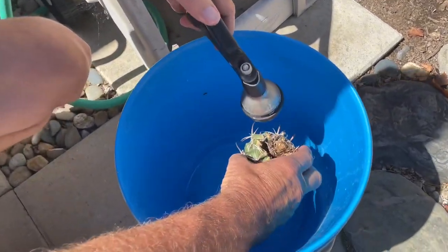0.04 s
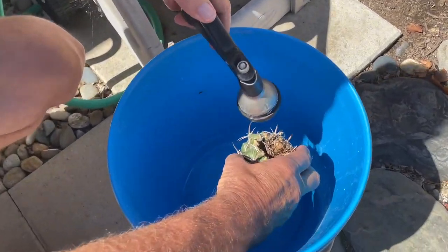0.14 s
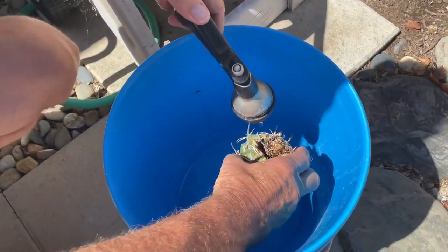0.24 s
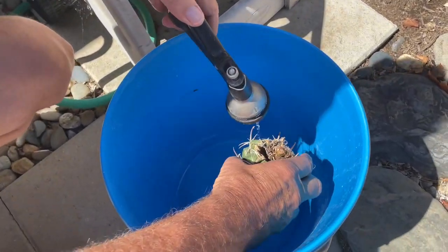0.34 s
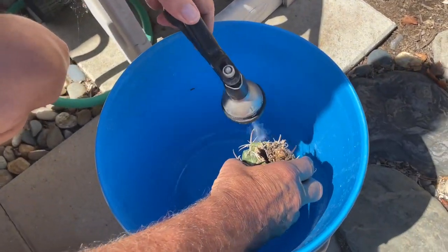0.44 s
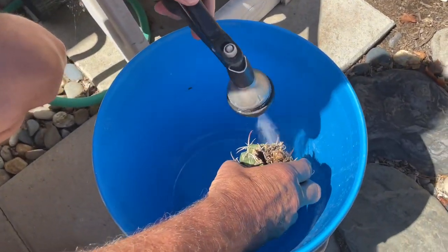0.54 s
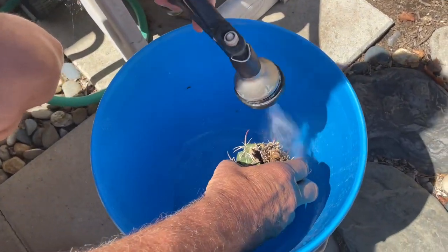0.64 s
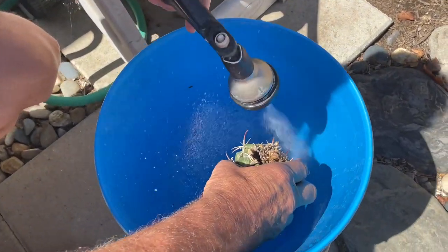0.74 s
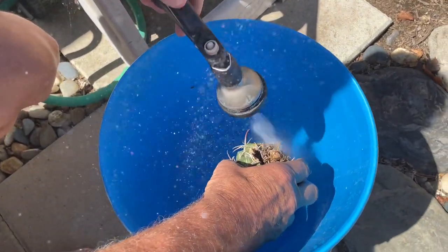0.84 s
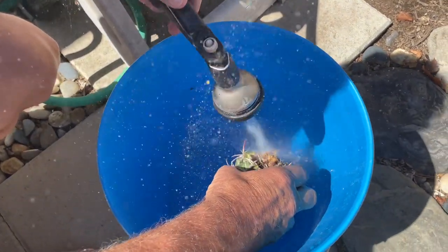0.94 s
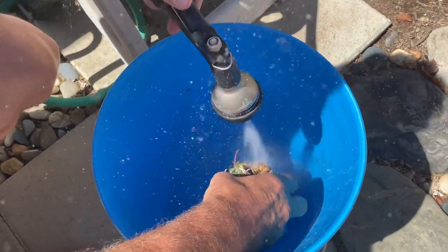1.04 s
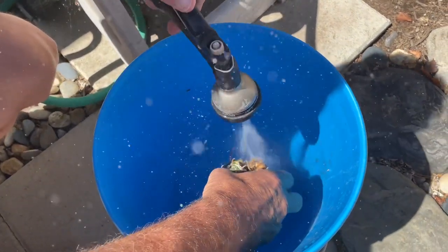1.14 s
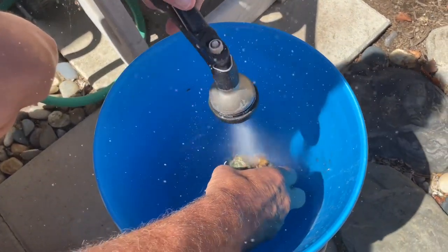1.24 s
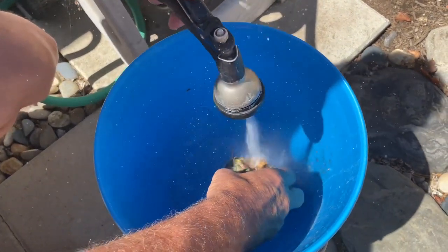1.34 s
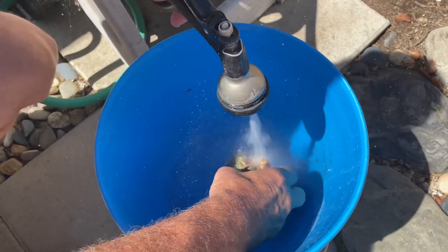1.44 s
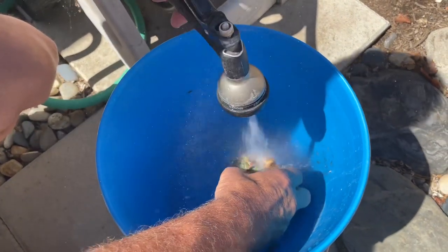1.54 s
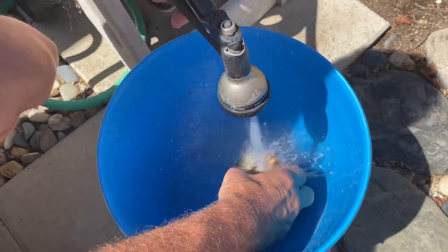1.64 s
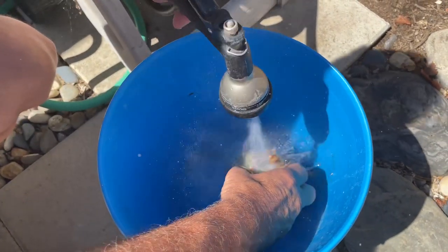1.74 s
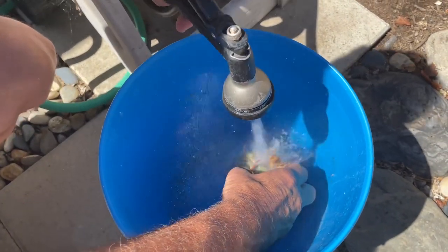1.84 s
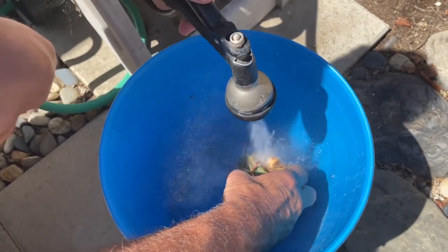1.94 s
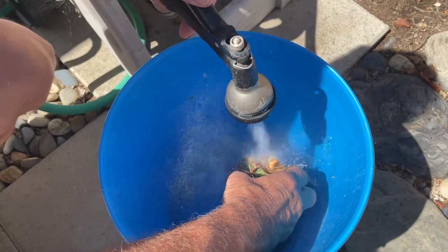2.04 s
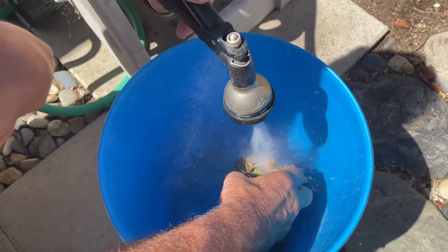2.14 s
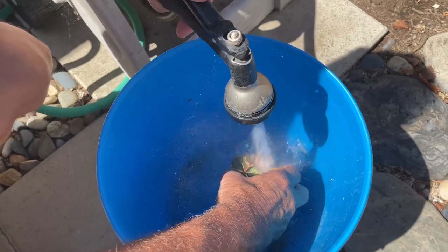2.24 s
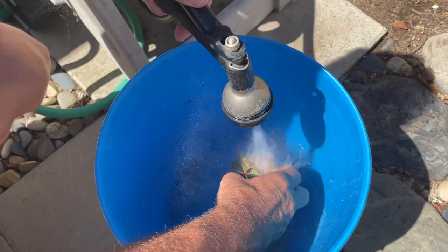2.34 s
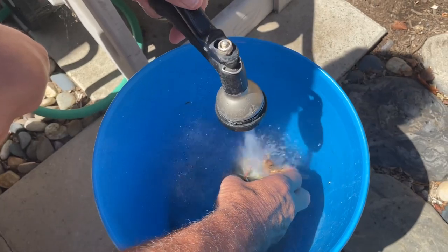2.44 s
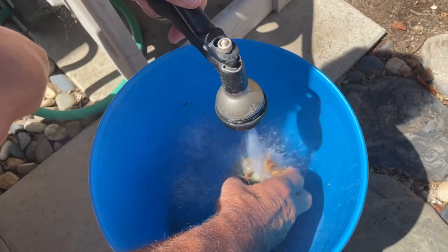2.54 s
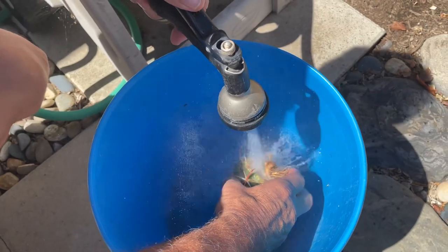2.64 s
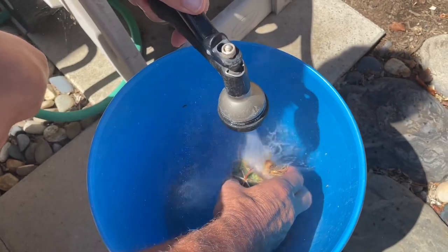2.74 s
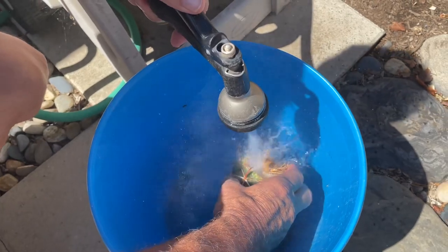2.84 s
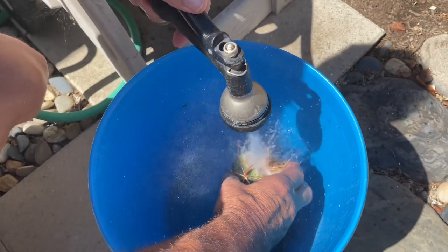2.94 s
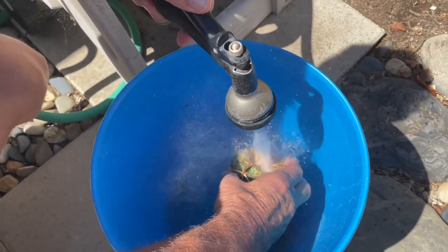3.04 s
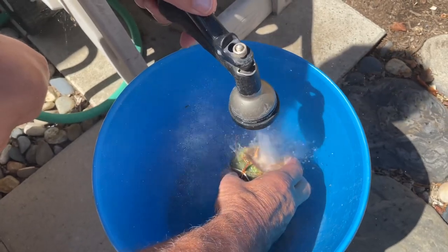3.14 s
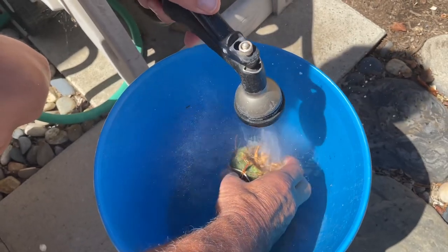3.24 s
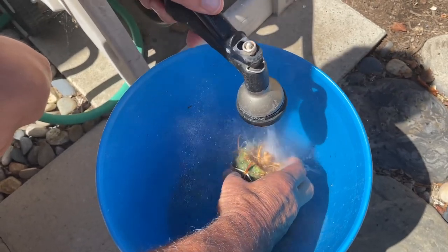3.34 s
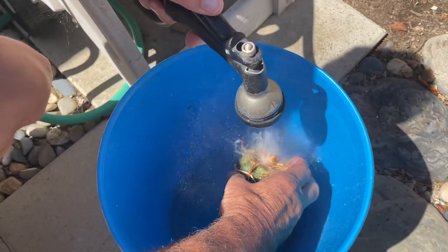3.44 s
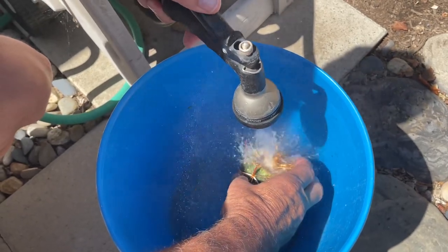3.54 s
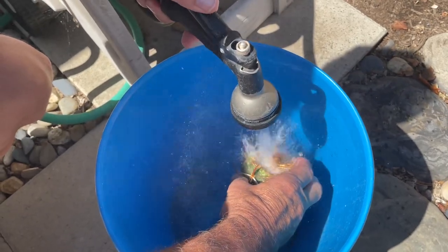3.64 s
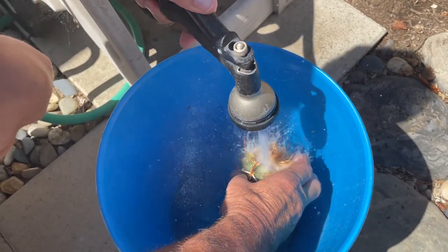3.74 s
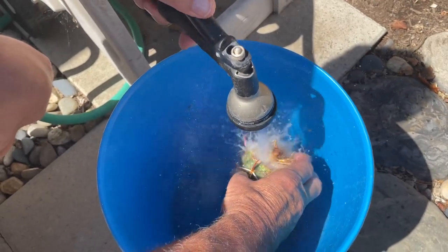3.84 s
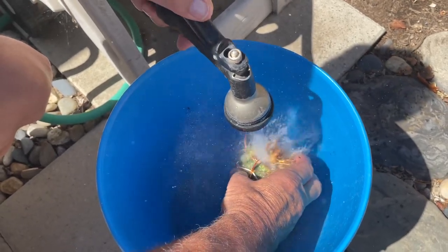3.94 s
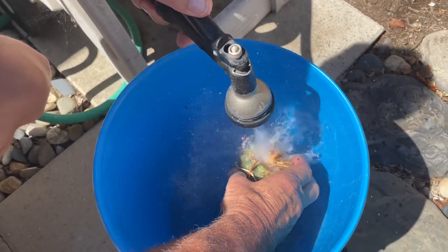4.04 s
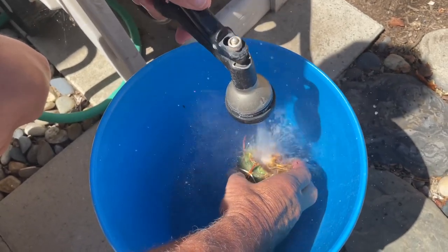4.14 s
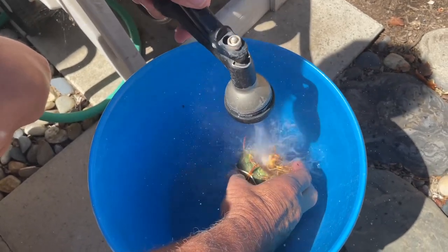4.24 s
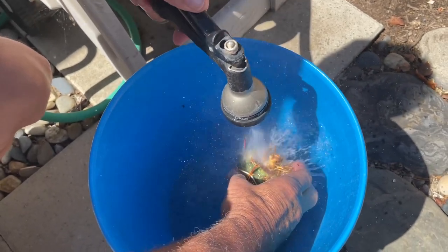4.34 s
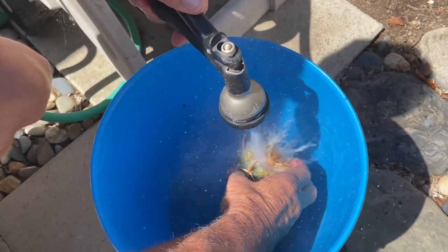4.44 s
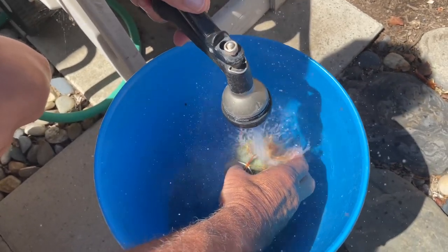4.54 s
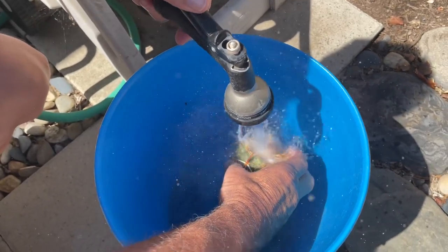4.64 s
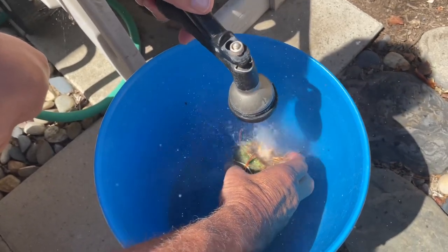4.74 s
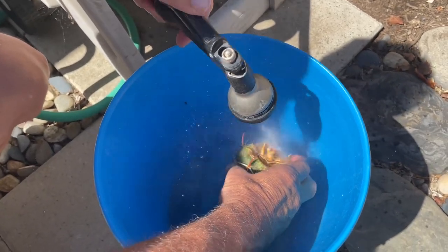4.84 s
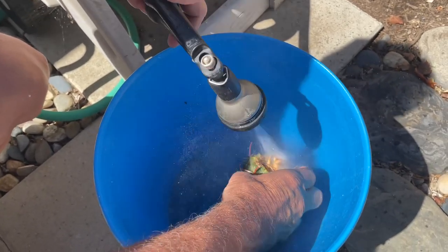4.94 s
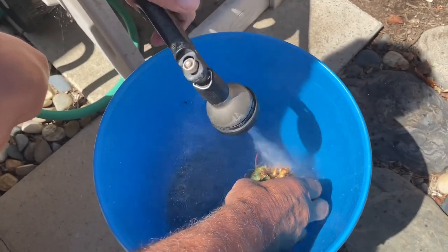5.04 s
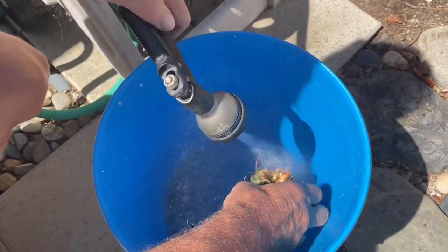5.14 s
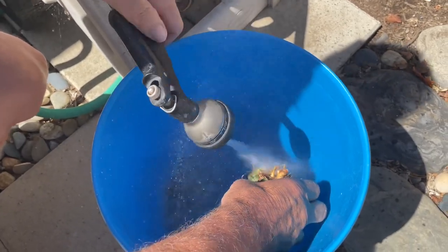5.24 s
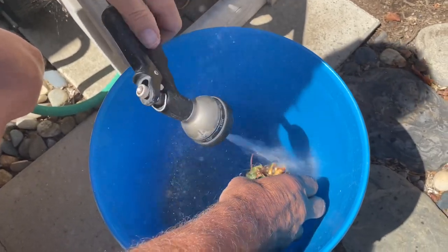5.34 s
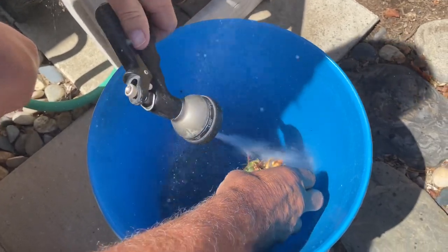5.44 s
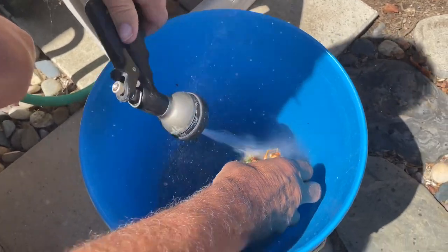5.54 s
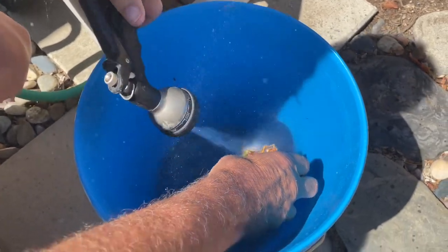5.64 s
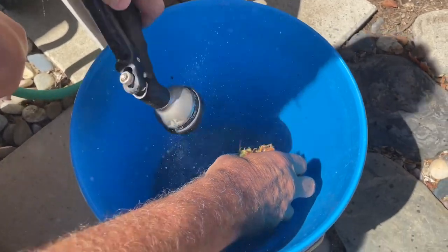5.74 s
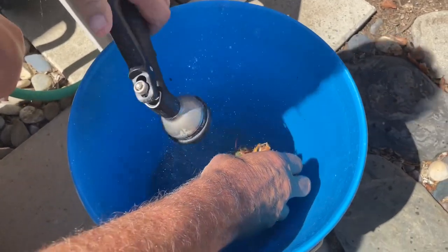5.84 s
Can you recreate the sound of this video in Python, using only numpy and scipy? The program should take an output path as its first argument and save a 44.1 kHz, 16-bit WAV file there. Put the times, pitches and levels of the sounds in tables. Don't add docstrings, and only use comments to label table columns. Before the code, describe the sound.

Close stereo microphone above a bucket in a yard: low traffic rumble, tiny valve squeaks and spits, then a sudden slap of water on plastic. About a second of resonant drumming follows, then over three seconds of surging, hissing spray on roots. The stream swings onto the plastic wall, drumming again, before a quick squeaky shutoff leaves faint rumble and dribble.

```python
import sys
import numpy as np
from scipy import signal
from scipy.fft import rfft, irfft, next_fast_len
from scipy.io import wavfile
from scipy.ndimage import uniform_filter1d, map_coordinates

SR = 44100
rng = np.random.default_rng(int(sys.argv[2]) if len(sys.argv) > 2 else 0)


def int16_out(signal):
    q = np.round(np.clip(np.atleast_2d(signal).T, -1, 1) * 32767)
    wavfile.write(sys.argv[1], SR, q.astype(np.int16))


def rack_gain(trim_db):
    fader = np.asarray(trim_db, float)
    return 10 ** (fader / 20)


N = 259749

# (frequency [Hz], level [dB per Hz])
TRAFFIC_COLOUR = [(12, -50), (20, -49), (62, -3.5), (82, -5.5), (140, -12), (176, -19.5), (251, -26),
                  (278, -17.5), (341, -23), (476, -28), (4290, -45.5), (9000, -61), (11700, -103),
                  (19800, -120)]
# (time [s], level [dB], time to fade by 60 dB [s])
ROCKS = [
    (.47, -31, 0.32),
    (1.06, -42, 3.5),
    (5.56, -49.5, 1.76),
]
# (time [s], level [dB])
OPENING = [(.19, -79), (.28, -65), (.29, -55.5), (.35, -53), (.4, -42.5), (.428, -53), (.436, -54),
           (.452, -46), (.482, -25.5)]
# (time [s], level [dB])
FLOW = [(.53, -27.5), (.625, -31), (.7, -39), (.8, -40.5), (.87, -33.5), (1.2, -29.5), (1.3, -34.5),
        (1.42, -36), (1.62, -33), (2.4, -33), (2.9, -31.5), (3.35, -33.5), (3.8, -30.5), (4.25, -32),
        (4.63, -31), (4.89, -36.5), (5.5, -35), (5.74, -33.5)]
# (time [s], hiss level [dB], drumming level [dB])
SPITS = [
    (.342, -50, -66),
    (.37, -42, -62),
    (0.418, -30, -37),
    (0.459, -24.5, -29),
    (0.489, -17.5, -26),
    (0.95, -40, -23),
    (1.278, -19, -39),
]
# (frequency [Hz], level [dB per Hz])
JET_COLOUR = [(1500, -12.5), (4000, -5), (6500, -6.5), (8200, -3.5), (10500, 0.5), (13000, -5.5),
              (15500, -2.5)]
# (delay [ms], level [dB])
ECHOES = [(1.3, -11), (2.4, -8.5), (3.7, -15), (5.2, -7), (7.4, -22)]
# (frequency [Hz], level [dB per Hz])
SPLASH_COLOUR = [(300, -30), (1000, -9.5), (2200, -5), (4000, -6.5), (6000, -6), (7500, -5.5), (12000, -34)]
# (frequency [Hz], width [Hz], level [dB])
CUPPED_AIR = [(2666, 140, -2), (2857, 120, -7.5), (3373, 105, -3.5), (3740, 84, -7.5), (4330, 290, -3.5),
              (5120, 220, -2), (5570, 360, -1), (6880, 56, -8)]
# (time [s], length [s], start pitch [Hz], end pitch [Hz], level [dB])
SQUEAKS = [
    (.352, .07, 4550, 4350, -49),
    (.411, .024, 1240, 1265, -37),
    (.448, .03, 1230, 1250, -38),
    (5.777, .048, 4700, 4280, -48),
    (5.778, .05, 1530, 1480, -55),
    (5.803, .035, 3080, 2730, -46),
    (5.833, .03, 1420, 1150, -44),
    (5.845, .026, 3050, 2750, -50),
    (5.838, .05, 6700, 6550, -59),
    (5.848, .028, 4500, 4550, -57),
]
# (frequency [Hz], width [Hz], level [dB])
AIR_COLUMN = [(148, 15.6, -11.5), (207.4, 27, -1.5)]
# (time [s], hold [s], level [dB])
GULPS = [
    (0.398, 0.0087, -33),
    (0.474, 0.0072, -34),
    (1.043, 0.24, -30.5),
    (5.565, 0.027, -36),
    (5.66, 0.014, -41),
]
# (frequency [Hz], width [Hz], level [dB])
BOTTOM = [(85, 9.4, -9), (447, 18, -10.5), (623, 54, -2), (822.5, 63, 2.5), (1034, 180, -2),
          (1105, 200, -5), (1260, 200, -3), (1540, 130, -5.5), (1797, 43, 0), (2180, 190, -5.5),
          (2700, 830, -9)]
WALL = [(614, 320, -13.5), (1063, 18, -15), (1244, 95, -5), (1450, 120, -2.5), (1692, 84, 1.5),
        (1820, 150, -1), (2240, 290, -5.5), (2580, 230, -2.5), (3800, 2700, -9.5)]
# (time [s], share missing the roots [0-1])
AIM = [(.4, .01), (.478, 0.43), (.485, 0.89), (.625, 1), (.64, 0.85), (.8, 1), (.88, 0.71), (1.02, 0.72),
       (1.045, 0.95), (1.272, 1), (1.288, 0.69), (1.62, 0.03), (4.84, 0.01), (4.89, 0.57), (5.17, 0.88),
       (5.25, 0.87), (5.4, 1), (5.62, 0.79)]
# (time [s], height [0 bottom to 1 wall])
HEIGHT = [(.6, 0.018), (.68, 0.63), (.8, 0.6), (.95, .4), (1.05, 0.071), (1.5, 0.084), (4.8, 0.74),
          (5.1, 0.67)]
# (frequency [Hz], level [dB], time to fade by 60 dB [s])
SLAP = [(85.7, -35, 0.61), (198, -28, 0.13), (442, -19.5, 0.21), (607, -34, 0.14), (838, -16, 0.29),
        (915, -8.5, 0.078), (1241, -12.5, 0.14)]
# (frequency [Hz], lead [radians])
LEFT_LEAD = [(0, .2), (700, .6), (1640, .4), (2700, 1.3), (4200, 1), (5300, 2.5), (6200, -.2), (8000, -2.9),
             (8800, -3.3), (10300, -5.4), (10800, -6.2), (13000, -6.4), (13900, -8.98), (14900, -9.42)]
# (frequency [Hz], likeness
ALIKE = [(60, .99), (300, .96), (650, .5), (1300, .6), (2500, .6), (5000, .5), (7000, .55), (8500, .78),
         (10200, .72), (10600, .955), (12900, .955), (13400, .55), (14000, .95), (15000, .97)]
# (frequency [Hz], likeness [0-1])
DRUM_ALIKE = [(60, .99), (300, 1), (600, 0.73), (900, 0.62), (1600, 0.64), (3000, 0.6)]
# (frequency [Hz], left minus right [dB])
LEFT_TILT = [(100, .5), (1400, 2), (2300, 0), (4400, -1), (6300, 4), (8400, 2.5), (9300, -.6), (11000, 0)]

ON_SPLASH, ON_BOTTOM, ON_WALL = (2.6, 2.9, -1.1), (-12.5, 12.44, 1.7), (-13.5, -1.1, 18)
USUAL_DB = -31
SHUT_S, SHUT_DB_PER_S = 5.748, 905
TIME = np.arange(N) / SR


def unit(x):
    return x / np.sqrt(np.mean(x ** 2) + 1e-20)


def lean_left(db):
    return rack_gain([[db], [-db]])


def along(points, hz):
    f, value = np.transpose(points)
    return np.interp(np.log(hz + 1), np.log(f + 1), value)


def over_time(rows):
    s, value = np.transpose(rows)
    return np.interp(TIME, s, value)


def wobble(rate):
    knots = rng.standard_normal(2000)
    coarse = map_coordinates(knots, [np.arange(N // 8 + 1) * 8 * rate / SR])
    return np.repeat(coarse, 8)[:N]


def burst(s, db, rise_s, t60, hold_s=0):
    t = TIME - s
    return db + 20 * np.minimum(t, 0) / rise_s - 60 * np.maximum(t - hold_s, 0) / t60


def joined(*levels_db):
    return 10 * np.log10(sum(rack_gain(2 * np.maximum(db, -150)) for db in levels_db))


def modes(table, f, sign=-1):
    total = 0
    for k, (centre, width, db) in enumerate(table):
        total = total + sign ** k * rack_gain(db) * 1j * f * width / (centre ** 2 - f ** 2 + 1j * f * width)
    return total


def plastic(response, hz):
    return response * np.sqrt(np.abs(response)) / (1 + (hz / 4200) ** 2)


def drops(spread_db, patchy_db):
    hail = rng.standard_normal((2, N))
    sizes = np.minimum(rng.exponential(size=N), 6)
    z = signal.stft(hail * rack_gain(spread_db * sizes), nperseg=512)[2]
    patches = uniform_filter1d(rng.standard_normal(z.shape[1:]), 5, 0)
    patches = unit(uniform_filter1d(patches, 12, 1))
    return signal.istft(z * rack_gain(patchy_db * patches), nperseg=512)[1][:, :N]


def ports(pair, level_db, colour, alike=ALIKE, lead=1):
    size = 2 * next_fast_len(N // 2 + 4096)
    hz = np.fft.rfftfreq(size, 1 / SR)
    turn = np.arccos(np.clip(along(alike, hz), -1, 1)) / 2
    half = rack_gain(along(LEFT_TILT, hz) / 2) * np.exp(.5j * lead * along(LEFT_LEAD, hz))
    gain = colour(hz) * hz ** 4 / (hz ** 4 + 45 ** 4)
    gain = gain / np.sqrt(np.mean(np.abs(gain) ** 2))
    blend = np.array([np.cos(turn), np.sin(turn)])
    mid, side = rfft(unit(pair) * rack_gain(level_db), size) * gain * blend
    return irfft(np.array([(mid + side) * half, (mid - side) / half]), size)[:, :N]


def yard():
    alike = [(100, 1.0), (1000, 0.12), (5000, 0.13)]
    ducking = np.clip((TIME - .5) / 0.096, 0, 1)
    traffic_db = -47 - 17.5 * ducking + 0.95 * wobble(3.65)
    rocking_db = [burst(s, db, 0.086, t60, 0.02) for s, db, t60 in ROCKS]
    level_db = joined(traffic_db, *rocking_db) - 1.0

    def colour(hz):
        return rack_gain(along(TRAFFIC_COLOUR, hz))
    return ports(rng.standard_normal((2, N)), level_db, colour, alike, lead=.2)


def levels():
    opening_db = over_time(OPENING + FLOW) - SHUT_DB_PER_S * np.maximum(TIME - SHUT_S, 0)
    flow_db = joined(opening_db, burst(5.79, -49.5, 0.018, 1))
    swung_away = np.clip(15 * (TIME - 5.63), 0, .2)
    stray = np.clip(over_time(AIM) - swung_away, 0, 1)
    height = np.clip(over_time(HEIGHT), 0, 1)
    wet_db = flow_db + 2 * np.minimum(over_time(OPENING) + 41.5, 0)

    def landed(on):
        roots, bottom, wall = on
        return wet_db + (1 - stray) * roots + stray * ((1 - height) * bottom + height * wall)
    follow_db = 0.31 * (landed(ON_BOTTOM) - USUAL_DB - ON_BOTTOM[0])
    rest_db = -47.5 + follow_db + np.minimum(flow_db + 47, 0)
    gulps_db = [burst(s, db, 0.013, 0.16, hold) for s, hold, db in GULPS]
    boom_db = joined(rest_db + 1.16 * wobble(16), *gulps_db)
    spit_hiss_db = joined(*[burst(s, hiss, 0.014, .055) for s, hiss, drum in SPITS])
    spit_drum_db = joined(*[burst(s, drum, 0.014, .055) for s, hiss, drum in SPITS])
    drip_db = 5.5 * (TIME > SHUT_S + .02)
    hiss_db = joined(flow_db - drip_db, spit_hiss_db) + 0.27 * wobble(7)
    extra_db = (1 - stray) * np.clip(flow_db - USUAL_DB, -5, 5)
    splash_db = joined(landed(ON_SPLASH) + extra_db, spit_hiss_db - 4.5)
    return hiss_db, splash_db, boom_db, joined(landed(ON_BOTTOM), spit_drum_db), landed(ON_WALL)


def nozzle_hiss(level_db):
    def colour(hz):
        return rack_gain(along(JET_COLOUR, hz))
    return ports(drops(2.76, 1.0), level_db + 6, colour)


def bucket_echoes(pair):
    hz, t, z = signal.stft(pair, SR, nperseg=2048)
    band = 1 / (1 + (hz / 8500) ** 8) / (1 + (2000 / (hz + 1)) ** 4)
    comb = np.ones(z.shape, complex)
    for ms, db in ECHOES:
        creep = np.array([wobble(1.5)[::1024], wobble(1.5)[::1024]])
        creep = np.pad(creep, ((0, 0), (0, len(t) - creep.shape[1])), "edge")
        delay = (ms * rng.uniform(.9, 1.1, (2, 1)) + 0.052 * creep) / 1000
        comb += (rack_gain(db) * band)[:, None] * np.exp(-2j * np.pi * hz[:, None] * delay[:, None])
    return signal.istft(z * comb, SR, nperseg=2048)[1][:, :N]


def splash(level_db):
    def colour(hz):
        return rack_gain(along(SPLASH_COLOUR, hz)) * (.3 + np.abs(modes(CUPPED_AIR, hz)))
    return ports(drops(3.1, 0.96), level_db - .6, colour)


def valve():
    out = np.zeros(N + SR)
    waver = 1 + .006 * wobble(150)
    flutter = np.clip(wobble(300), -1.5, 1.5)
    for s, length, start_hz, end_hz, db in SQUEAKS:
        at, n = round(s * SR), round(length * SR)
        u = np.linspace(0, 1, n)
        pitch = (start_hz + (end_hz - start_hz) * u ** 2.2) * np.resize(waver[at:], n)
        rough_db = 3 * np.resize(flutter[at:], n)
        swell = rack_gain(db + 2.0 + rough_db) * np.abs(np.sin(np.pi * u)) ** 0.26
        out[at:at + n] += swell * np.sin(2 * np.pi * np.cumsum(pitch) / SR)
    return out[:N] * lean_left(.8)


def air_boom(level_db):
    def colour(hz):
        return modes(AIR_COLUMN, hz) * hz ** 2 / (hz ** 2 + 110 ** 2) / (1 + (hz / 300) ** 4)
    return ports(drops(2.54, 0.99), level_db + 2.5, colour) * lean_left(.6)


def bottom_drumming(level_db):
    def colour(hz):
        return plastic(modes(BOTTOM, hz, sign=1), hz)
    return ports(drops(0.64, 2.93), level_db + 0.36 * wobble(50), colour, DRUM_ALIKE) * lean_left(.8)


def wall_drumming(level_db):
    def colour(hz):
        return plastic(modes(WALL, hz), hz)
    return ports(drops(1.14, 1.7), level_db + 1.2 * wobble(60), colour, DRUM_ALIKE) * lean_left(.6)


def slap():
    t = np.maximum(TIME - .485, 0)
    ring = sum(rack_gain(db - 60 * t / t60) * np.sin(2 * np.pi * hz * t) for hz, db, t60 in SLAP)
    return ring * (1 - np.exp(-t / 0.00086)) * lean_left(1.2)


def water():
    hiss_db, splash_db, boom_db, bottom_db, wall_db = levels()
    surge_db = .5 * wobble(14) + 0.33 * wobble(45)
    spray = nozzle_hiss(hiss_db + surge_db) + splash(splash_db + surge_db)
    drumming = bottom_drumming(bottom_db + surge_db) + wall_drumming(wall_db + surge_db)
    return spray + drumming + air_boom(boom_db)


def scene():
    return bucket_echoes(water()) * rack_gain(-0.72) + slap() + valve() + yard()


def roll_off(x):
    return signal.sosfilt(signal.butter(12, 15860, fs=SR, output="sos"), x)


def record(dry):
    rounded = dry / (1 + np.abs(dry / .98) ** 4) ** .25
    return roll_off(rounded)


dry = scene()
out = record(dry)
int16_out(out)
```